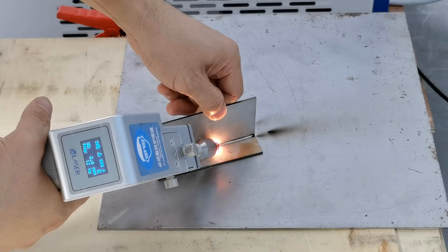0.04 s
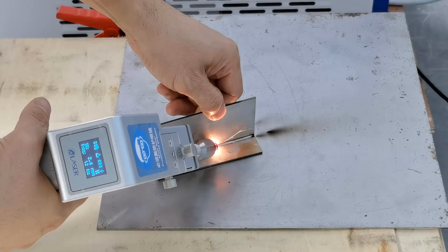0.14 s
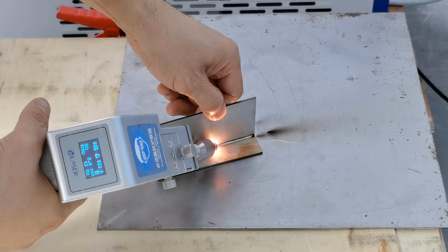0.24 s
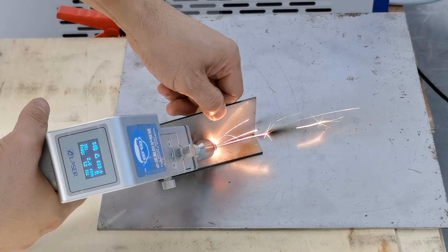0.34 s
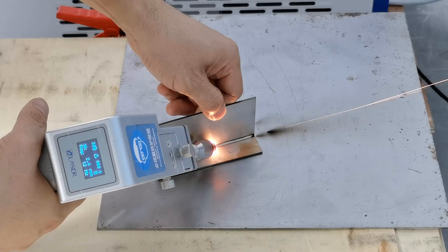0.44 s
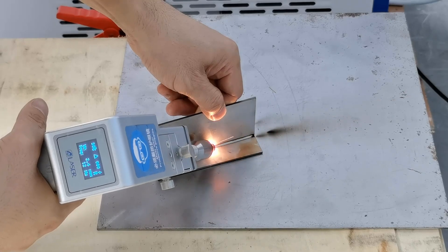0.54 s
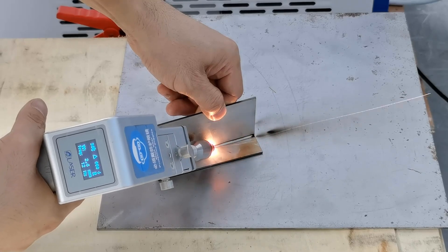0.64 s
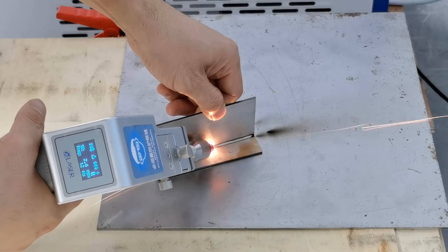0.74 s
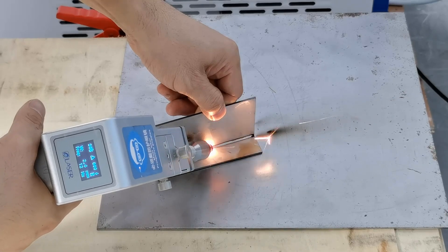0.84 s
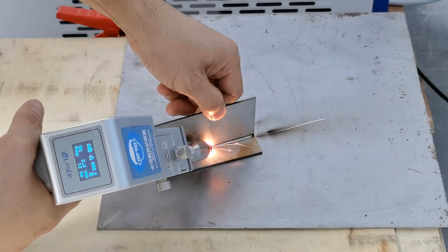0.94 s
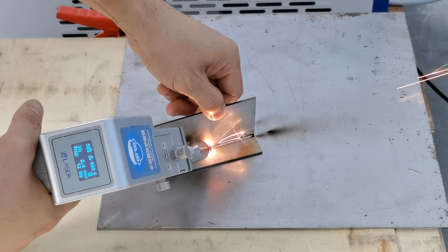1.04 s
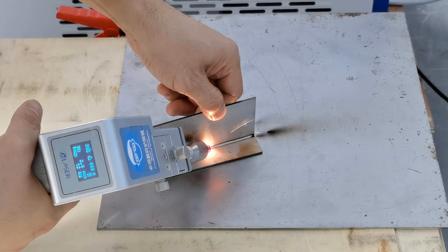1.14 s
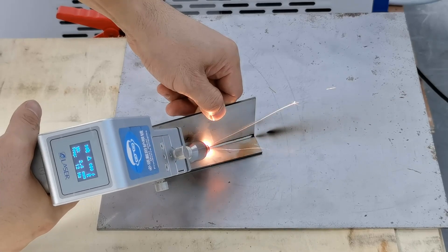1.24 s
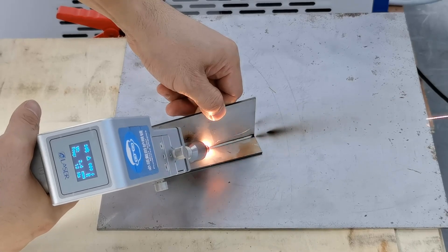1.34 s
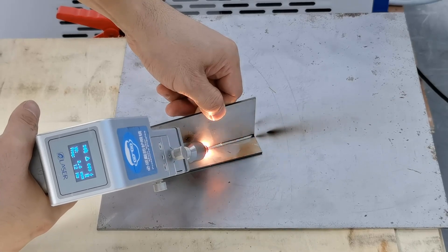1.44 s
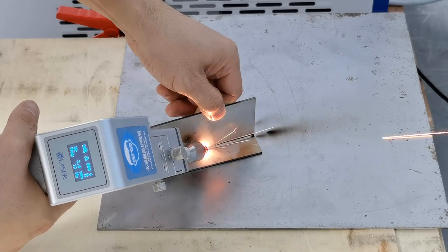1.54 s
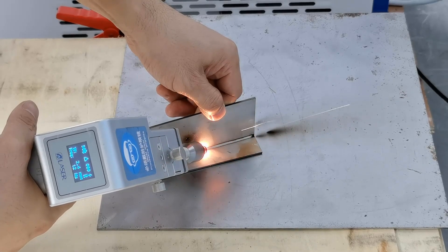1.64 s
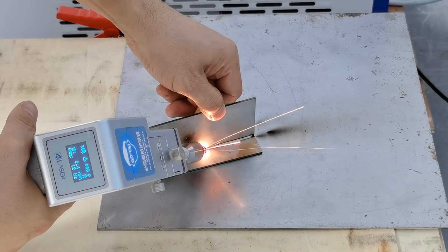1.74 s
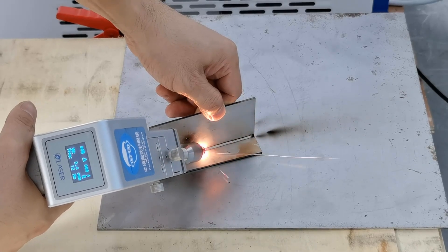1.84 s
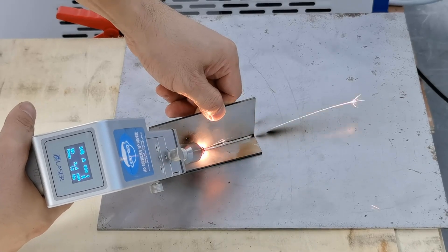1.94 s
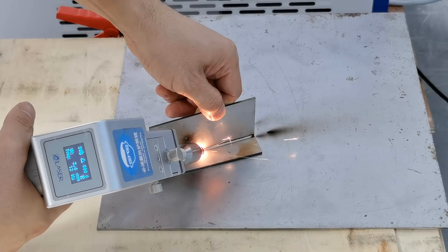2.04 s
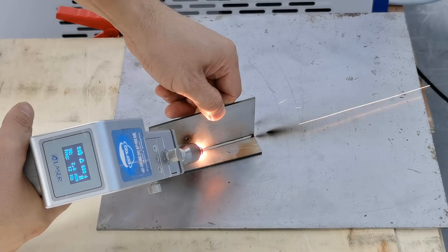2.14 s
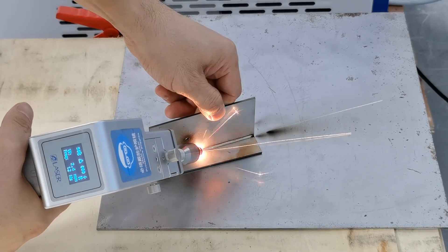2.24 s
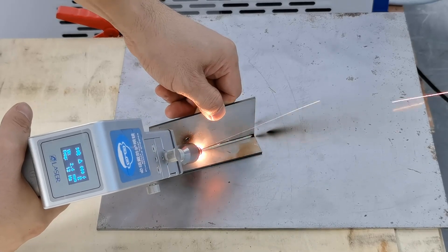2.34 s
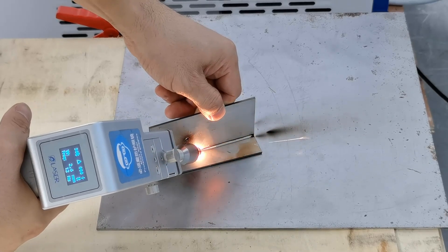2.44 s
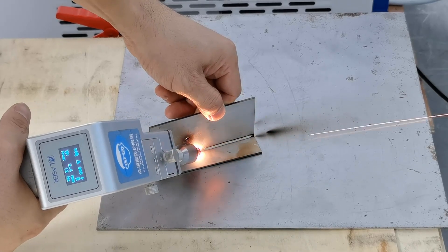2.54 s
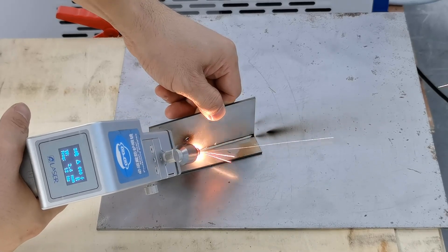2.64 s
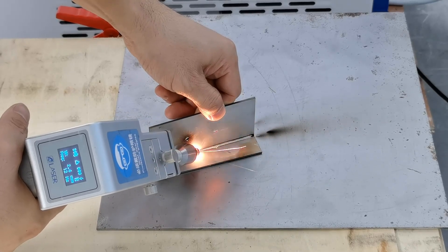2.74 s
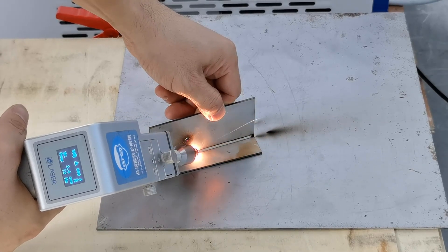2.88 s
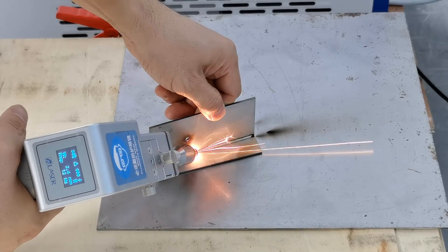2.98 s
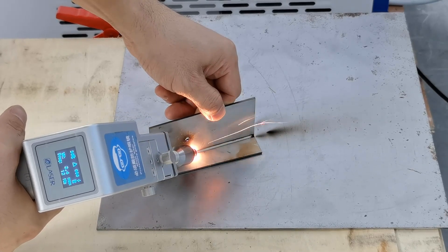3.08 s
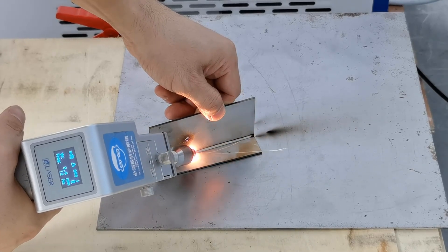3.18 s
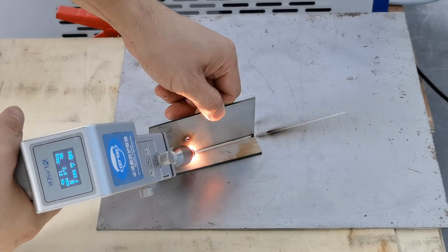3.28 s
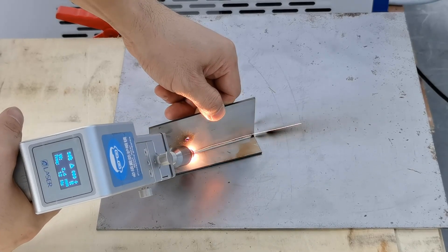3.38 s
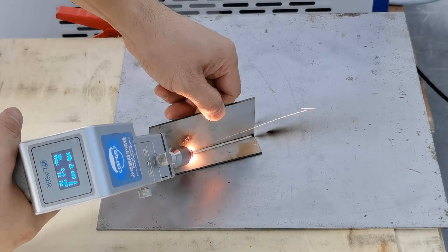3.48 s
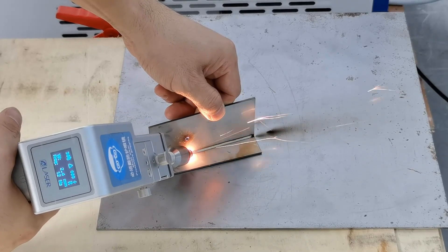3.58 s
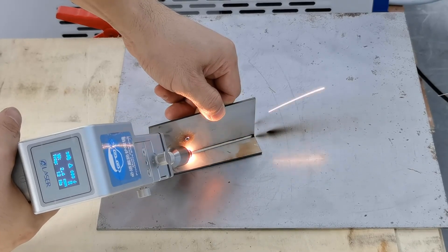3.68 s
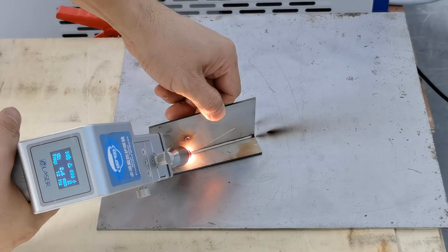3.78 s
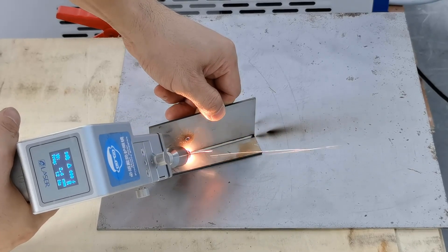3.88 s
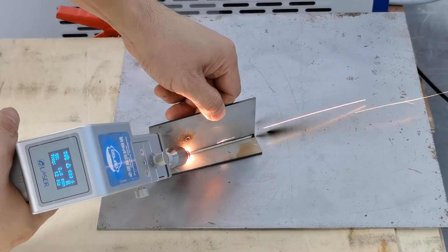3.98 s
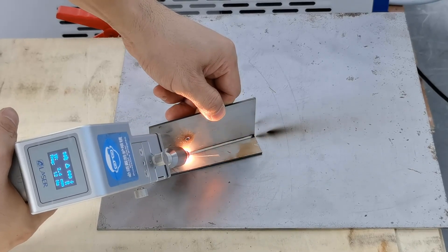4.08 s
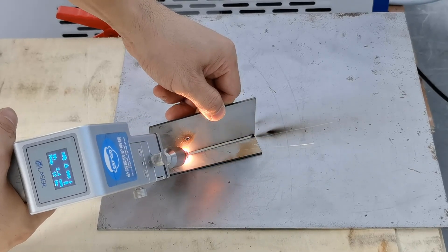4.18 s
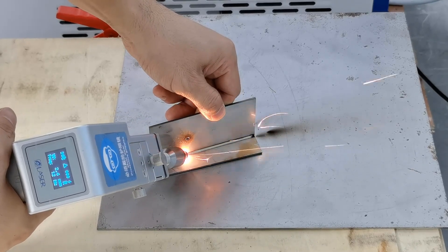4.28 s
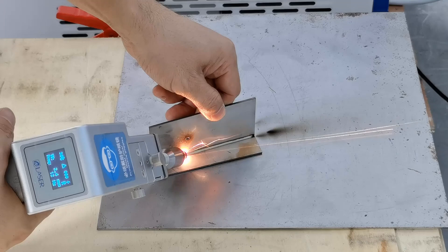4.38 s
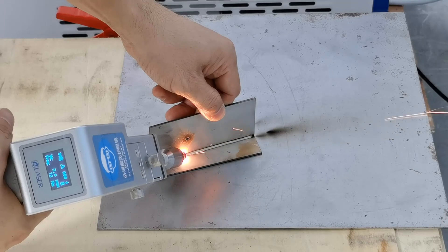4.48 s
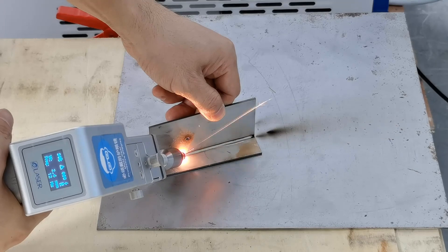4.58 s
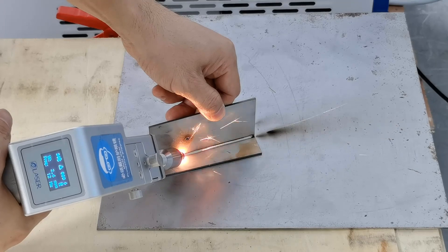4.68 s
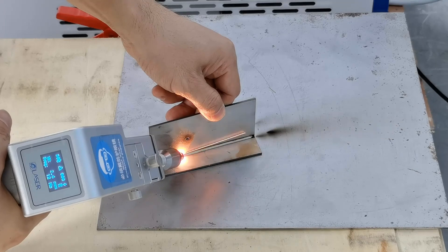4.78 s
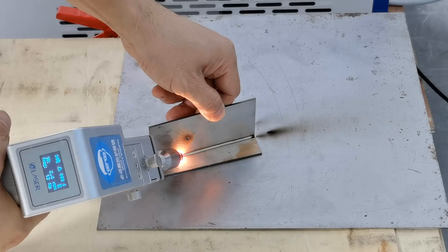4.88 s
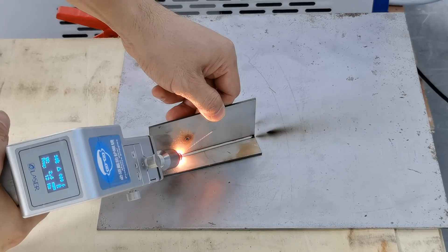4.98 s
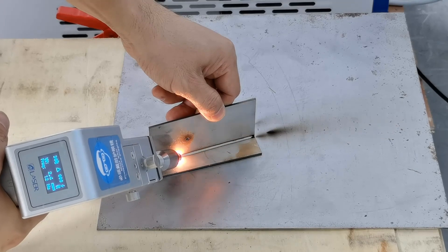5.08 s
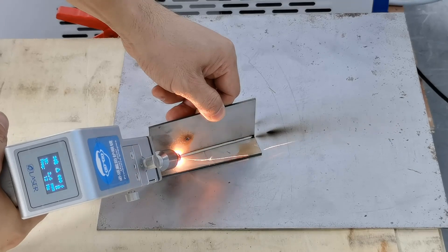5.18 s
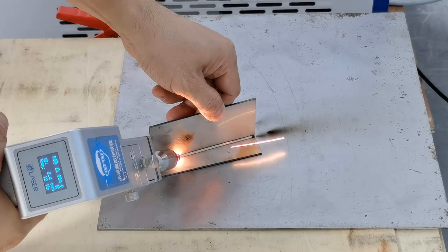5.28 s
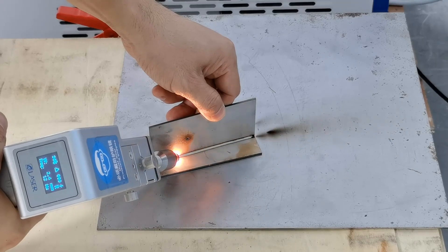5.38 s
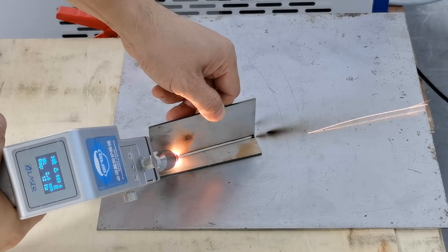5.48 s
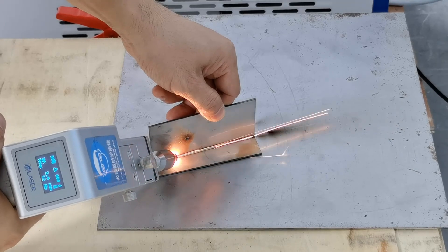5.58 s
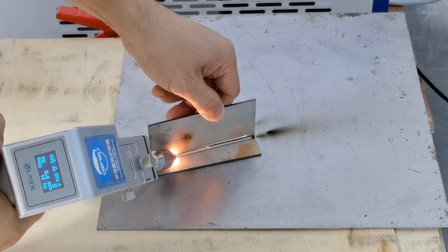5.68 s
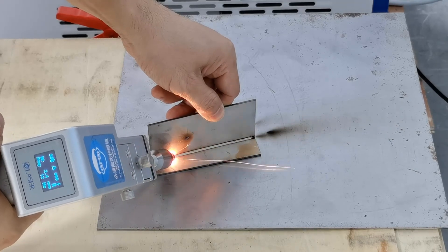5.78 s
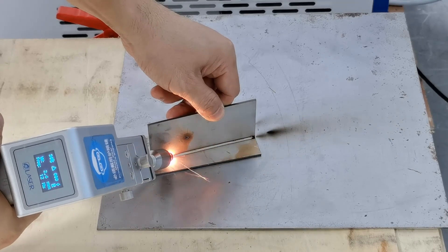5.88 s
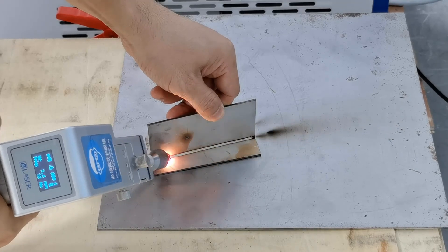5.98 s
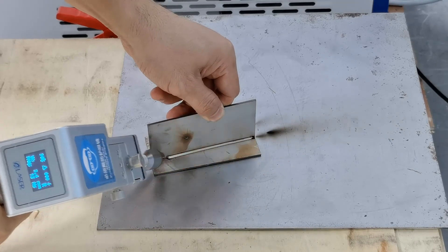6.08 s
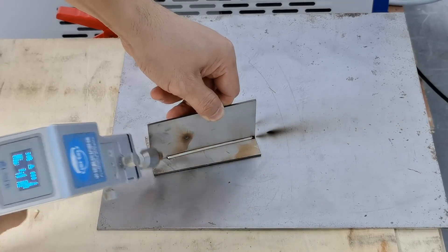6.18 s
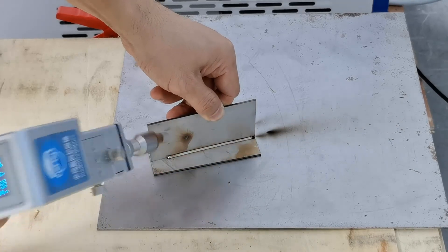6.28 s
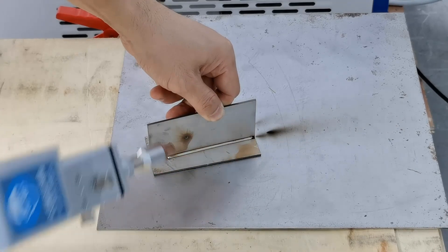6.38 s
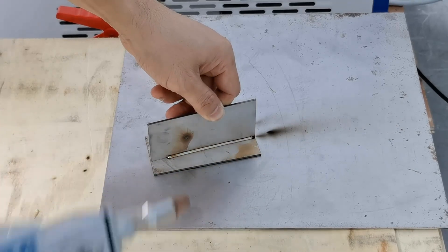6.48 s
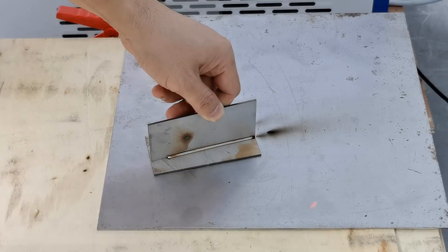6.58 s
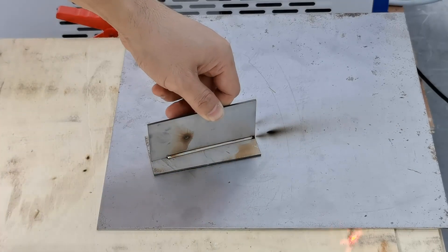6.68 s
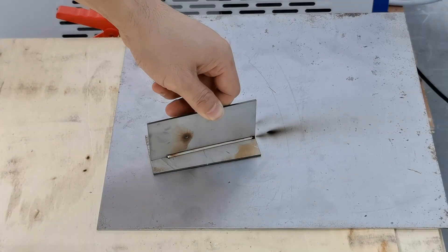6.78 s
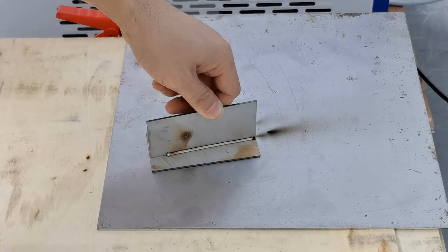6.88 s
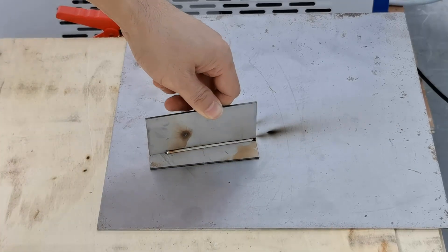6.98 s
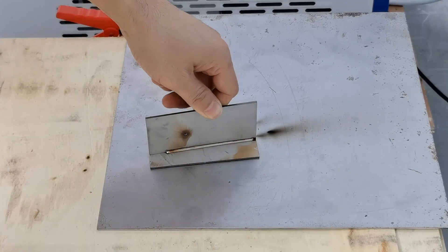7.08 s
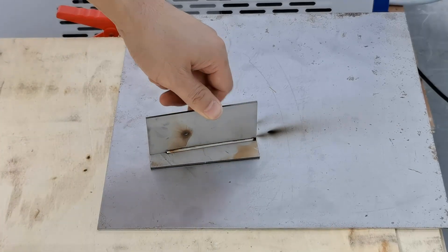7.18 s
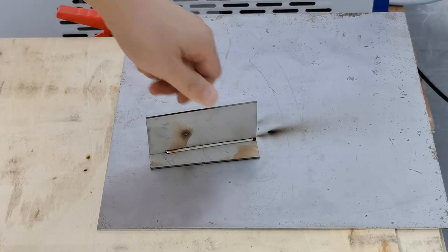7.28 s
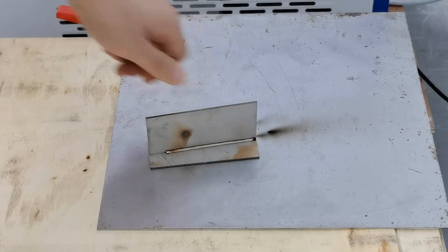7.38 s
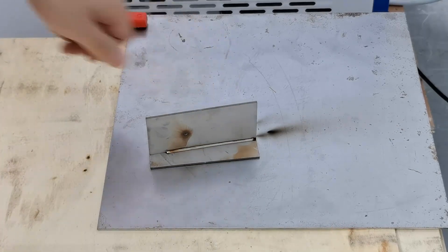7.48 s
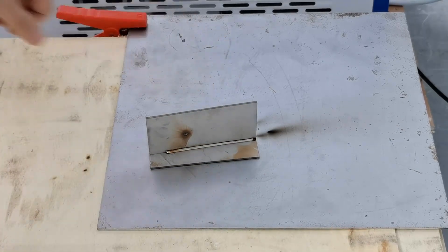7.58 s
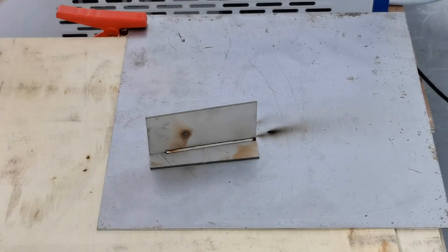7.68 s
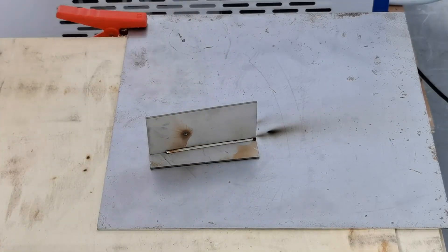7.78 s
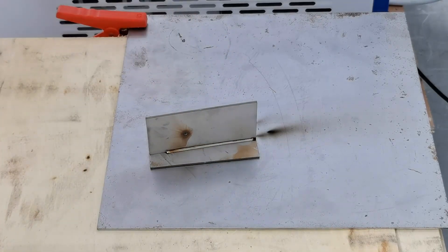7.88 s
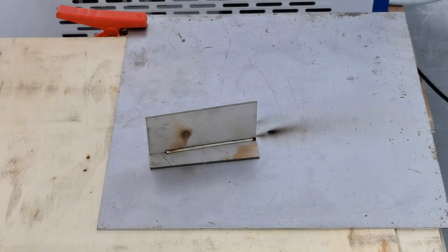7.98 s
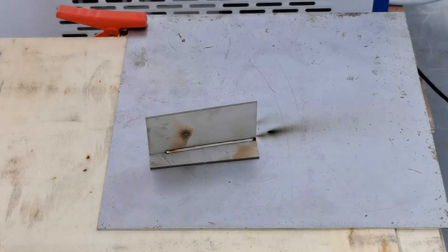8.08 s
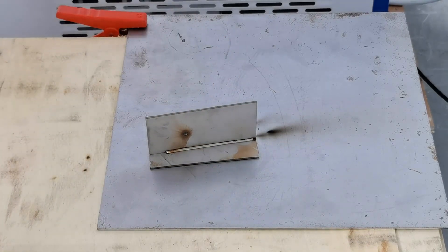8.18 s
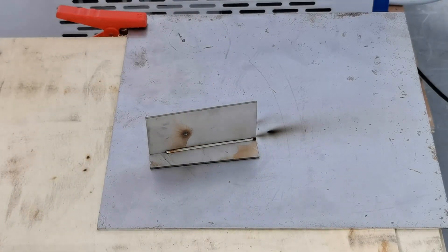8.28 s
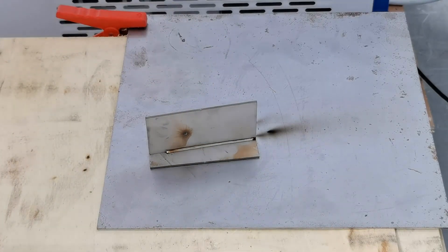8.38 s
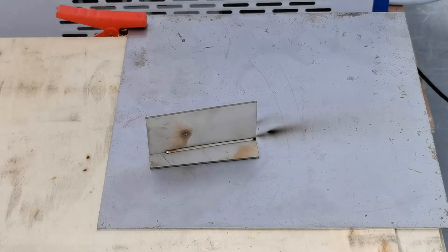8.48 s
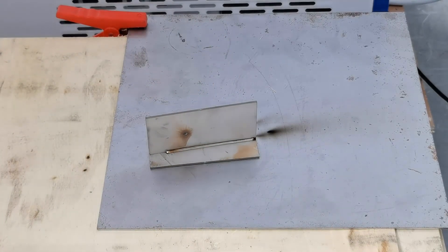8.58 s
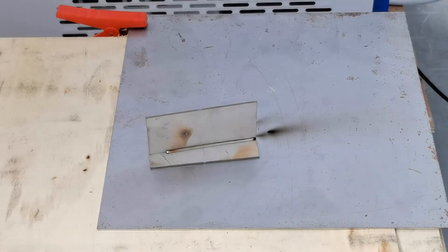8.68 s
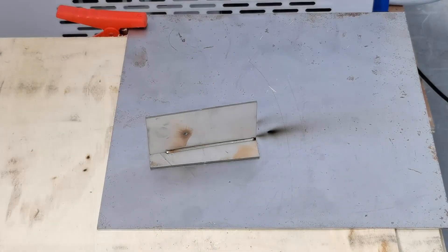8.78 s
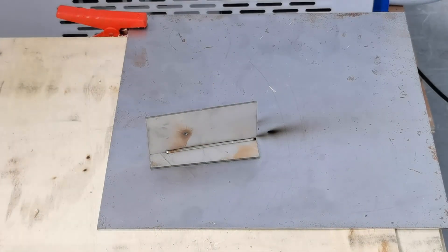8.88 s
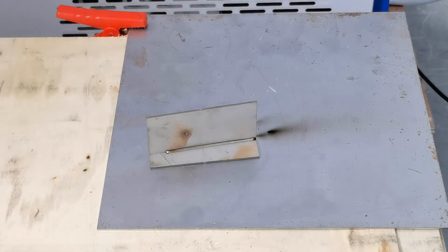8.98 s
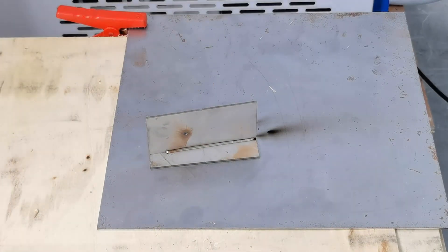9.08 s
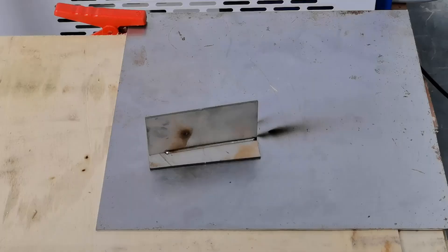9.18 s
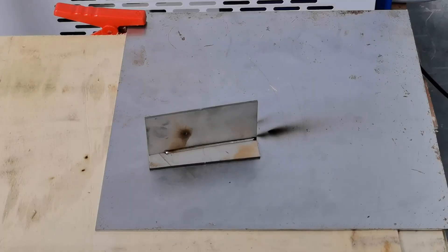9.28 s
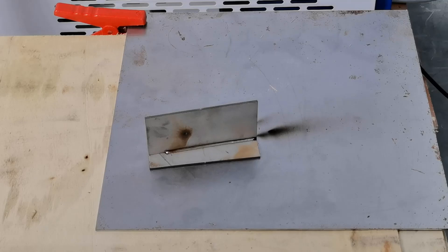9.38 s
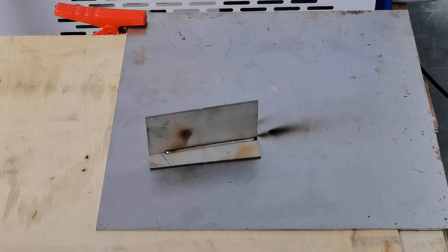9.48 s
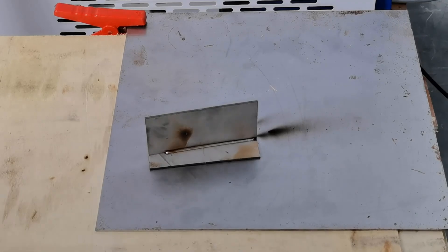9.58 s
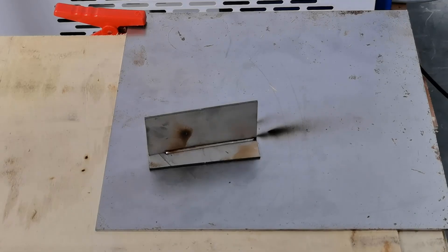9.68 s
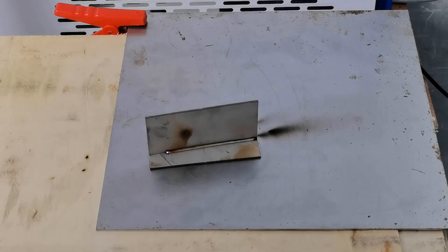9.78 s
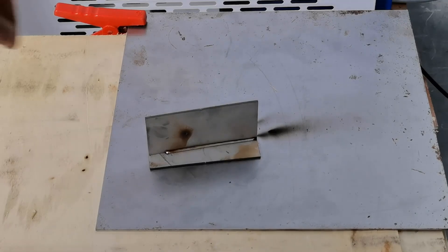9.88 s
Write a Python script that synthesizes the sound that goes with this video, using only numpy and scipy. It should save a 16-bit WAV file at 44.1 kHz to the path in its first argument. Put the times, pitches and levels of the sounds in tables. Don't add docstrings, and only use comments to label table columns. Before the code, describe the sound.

Close up at a workshop bench, a handheld laser welder gives a loud, bright gas hiss with a rapid low throb for about six seconds. It breaks into a brief smooth jet, a valve rattles shut, and a thin leak fades. Small cable taps, heavy footsteps and cloth brushes follow over quiet fans, then a far machine starts up with a thin belt squeal. Phone microphone, stereo.

```python
import sys
import numpy as np
from scipy import signal
from scipy.fft import rfft, irfft
from scipy.io import wavfile
from scipy.ndimage import uniform_filter1d

SR = 44100
rng = np.random.default_rng(int(sys.argv[2]) if len(sys.argv) > 2 else 0)


def transcribe(u):
    v = np.clip(np.atleast_2d(u).T, -1, 1)
    q = np.round(v * 32767).astype(np.int16)
    wavfile.write(sys.argv[1], SR, q)


def gain_from_decibels(decibels):
    exponent = np.asarray(decibels, float) / 20
    return 10 ** exponent


N = 438354
TIME = np.arange(N) / SR
BINS = np.fft.rfftfreq(N, 1 / SR) + 1
BEAM_OFF_S = 6.045


def unit(x):
    return x / np.sqrt(np.mean(x ** 2))


def since(s):
    return np.maximum(TIME - s, 0)


def over_hz(table):
    hz, value = np.transpose(table)
    return np.interp(np.log(BINS), np.log(hz), value)


def resonances(table):
    return sum(db / (1 + (2 * (BINS - hz) / width) ** 2) for hz, width, db in table)


def shape(x, gain):
    return irfft(rfft(x, N) * gain, N)


def walk(rate):
    k = int(SR / rate)
    held = np.repeat(rng.standard_normal(N // k + 1), k)
    return unit(uniform_filter1d(uniform_filter1d(held, k), k)[:N])


def sides(db):
    db = np.atleast_1d(db)
    return gain_from_decibels(np.array([db, -db]) / 2)


def add(out, x, s):
    i = int(s * SR)
    out[:, i:i + x.shape[1]] += x[:, :N - i]


def pair(db, alike, moving=False):
    # time in seconds, samples by which the right port lags
    right_lag = [(0, 1.2), (6.1, 2.9)]
    shared, own = rng.standard_normal(N), rng.standard_normal((2, N))
    late = shared
    if moving:
        hz, s, frames = signal.stft(shared, SR, nperseg=1024)
        lag = np.interp(s, *np.transpose(right_lag))
        late = signal.istft(frames * np.exp(-2j * np.pi * np.outer(hz, lag) / SR), SR)[1][:N]
    alike = np.clip(alike, 0, 1)
    common = shape(np.array([shared, late]), gain_from_decibels(db) * alike ** .5)
    return common + shape(own, gain_from_decibels(db) * (1 - alike) ** .5)


def breathe(x, edges_hz, slow_db, quick_db):
    band = np.digitize(BINS, edges_hz)
    out = 0
    for k in range(len(edges_hz) + 1):
        out = out + shape(x, band == k) * gain_from_decibels(slow_db * walk(2.3) + quick_db * walk(14))
    return out


def returns():
    spread_ms, echo_db, echo_hz = 26, -17.5, 5000
    lag_s = .002 + rng.random((2, 24, 1)) * spread_ms / 1000
    size = gain_from_decibels(echo_db - 6 * lag_s * 1000 / spread_ms) * np.sign(rng.standard_normal((2, 24, 1)))
    ripple = np.sum(size * np.exp(-2j * np.pi * BINS * lag_s), axis=1)
    return 1 + BINS / (BINS + echo_hz) * 1.5 * ripple


def waver(x, dips):
    drift, rate_hz = .01, 24
    hz, s, frames = signal.stft(x, SR, nperseg=1024)
    at, dip_db = np.minimum(s * SR, N - 1).astype(int), 0
    for centre, width, depth_db in dips:
        depth = 1.3 * depth_db * np.maximum(.45 + walk(rate_hz)[at], 0) ** 1.5
        away = (hz[:, None] - centre * (1 + drift * walk(1.5)[at])) / width
        dip_db = dip_db - depth * np.exp(-(2 * away) ** 4)
    return signal.istft(frames * gain_from_decibels(dip_db), SR)[1][:, :N]


def echo(length=.9):
    # band in Hz, level in dB, t60 in seconds
    walls = [(60, -6, 1), (127, 1.5, 0.56), (257, 4, 0.46), (500, -1.5, 0.28), (980, 0, 0.38),
             (2000, -15, 0.49), (4500, -12, 0.47), (9000, -20, .3)]
    t, tail = np.arange(int(length * SR)) / SR, 0
    for hz, db, t60 in walls:
        octave = signal.butter(2, [hz / 1.27, hz * 1.53], "bandpass", fs=SR, output="sos")
        mid, side = signal.sosfilt(octave, rng.standard_normal((2, len(t))))
        both = mid + min(0.13 + hz / 1100, 1) * side * np.array([[1], [-1]])
        tail = tail + gain_from_decibels(db - 60 * t / t60) * both / hz ** .5
    return tail * np.clip(t / 0.0021, 0, 1)


def workshop():
    # frequency in Hz, level in dB per Hz
    rumble_hz = [(12, -42), (20, -8.5), (81, -1.5), (285, -12), (350, -19), (381, -20), (510, -18.5),
                 (648, -26), (1100, -23), (1200, -36.5), (1560, -60), (2640, -120)]
    rustle_hz = [(350, -39), (600, -7), (651, -6.5), (902, -13), (1110, -8.5), (1250, -9.5), (1490, -11.5),
                 (2010, -15.5), (4430, -19.5), (7040, -28.5), (13300, -26), (14500, -26.5), (15000, -55.5)]
    # frequency in Hz, level in dB rms
    fan_tones = [(48.4, -62), (96.9, -75.5), (129.2, -68.5), (285.3, -72.5), (382.2, -78), (473.7, -70.5),
                 (667.5, -75), (1141, -79.5), (2283, -82), (2659, -82.5)]
    machine_s, kick_share, run_up_s = 9.255, 0.75, .2
    busy = np.exp(-.5 * ((TIME - 7.95) / 0.29) ** 2)
    machine = (TIME > machine_s) * (1 - (1 - kick_share) * np.exp(-since(machine_s) / run_up_s))
    rumble_alike = over_hz([(100, 0.82), (400, 0.54), (900, .1)])
    rumble = gain_from_decibels(-55.5 + 3 * busy + 9 * machine) * unit(pair(over_hz(rumble_hz), rumble_alike))
    rustle = gain_from_decibels(-64 + 3 * busy + 7.5 * machine) * unit(pair(over_hz(rustle_hz), 0.038))
    fans = 0
    for hz, db in fan_tones:
        turn = 2 * np.pi * hz * TIME + 0.76 * walk(3) + hz * np.array([[0], [.0008]])
        fans = fans + gain_from_decibels(db + 4 + 2.5 * walk(4)) * np.sin(turn)
    return breathe(rumble + rustle, [90, 250, 700, 2000, 5500], 0.55, 1.7) + fans


def squeal():
    # multiple of the slip rate, level in dB
    slip_tones = [(3, -22), (4, -12), (5, -20), (6, -15.5), (7, -4), (8, 4), (9, -7)]
    from_hz, to_hz, rise_s = 1420, 1690, .042
    caught = since(9.762)
    hz = to_hz - (to_hz - from_hz) * np.exp(-caught / rise_s)
    gain = np.clip(caught / 0.007, 0, 1) * gain_from_decibels(-57.5 - 10 * np.exp(-caught / .06))
    turn = 2 * np.pi * np.cumsum(hz * (1 + .026 * walk(600))) / SR
    tones = 0
    for k, db in slip_tones:
        flicker_db = 3.5 * np.array([walk(90), walk(90)])
        tones = tones + gain_from_decibels(db + flicker_db) * np.sin(k * turn + np.array([[0], [k]]))
    return gain * tones


def thuds(blows, low_hz):
    # mode in Hz, level in dB, t60 in seconds
    floor_modes = [(64.8, -5, 0.59), (113, -16, 0.43), (166, -1.5, 0.64), (199.4, 2.5, 0.6),
                   (239.4, 1.5, 0.35), (348, -8.5, .3), (433, 0, 0.36), (490, 8, 0.33), (670, -6, 0.35),
                   (770, -12, .25), (1003, 13.5, 0.24), (1130, -3, .23)]
    out, t = np.zeros((2, N)), np.arange(int(.9 * SR)) / SR
    for s, blow_db, contact_ms, slap_db, delay_ms in blows:
        ring = 0
        for hz, db, t60 in floor_modes:
            a, b = rng.standard_normal(2)
            ring = ring + gain_from_decibels(db + 2.8 * a - 60 * t / t60) * np.sin(2 * np.pi * hz * (1 + 0.015 * b) * t)
        push = t[:900] * np.exp(-t[:900] * 1000 / contact_ms)
        first = -1.5 * gain_from_decibels(-60 * t / 0.024) * np.sin(2 * np.pi * 170 * t)
        struck = first - 0.29 * ring + gain_from_decibels(30.0) * echo()
        add(out, gain_from_decibels(blow_db) * signal.fftconvolve(struck, push[None] / push.sum(), axes=1), s)
        bright_hz = 620 + 27 * (slap_db + 47)
        slap = gain_from_decibels(-60 * t / 0.089) * rng.standard_normal((2, len(t)))
        slap = slap + gain_from_decibels(38) * signal.lfilter([1, -.9], 1, echo())
        slap = signal.lfilter(*signal.butter(1, [bright_hz / 2, bright_hz * 0.64], "bandpass", fs=SR), slap)
        slap = signal.lfilter(*signal.butter(1, 5500, fs=SR), slap)
        add(out, gain_from_decibels(slap_db + 14.5) * slap, s + delay_ms / 1000)
    return signal.lfilter(*signal.butter(2, low_hz, "highpass", fs=SR), out)


def footsteps():
    # start in seconds, blow in dB, contact in ms, slap in dB, slap delay in ms
    steps = [
        (7.446, -12.5, 1.22, -30, 1.21),
        (7.882, -25, 2.9, -54, 5.1),
        (8.093, -16.5, 0.52, -20.5, 7.3),
        (8.2, -16.5, 2.3, -38, 2.8),
        (8.267, -30, 1.3, -53, 1.7),
        (9.258, -38.5, 0.87, -50, 2.5),
    ]
    return thuds(steps, low_hz=45.5)


def brushes():
    # start in seconds, length in seconds, level in dB
    drags = [
        (7.458, 0.043, -53),
        (7.797, 0.053, -61),
        (7.889, 0.1, -57.5),
        (8.098, 0.066, -50.5),
        (8.552, 0.034, -69),
    ]
    swell = 0
    for s, length, db in drags:
        swell = swell + gain_from_decibels(db) * np.exp(-.5 * ((TIME - s - length / 2) / (length / 2.7)) ** 2)
    tone = resonances([(1275, 640, 11), (2960, 520, 6.6), (4730, 1300, 14)])
    tone = tone + over_hz([(500, -23), (1000, -4), (6000, -16), (12000, -10), (14400, -13), (15000, -45)])
    return swell * gain_from_decibels(1.5 * walk(120)) * unit(pair(tone, .2))


def cable_taps():
    # start in seconds, level in dB, mode in Hz, second mode in Hz, t60 in seconds
    tap_list = [(6.829, -51, 4500, 5200, .012), (6.844, -33.5, 970, 1580, 0.039),
                (6.848, -41, 900, 1650, 0.03), (6.865, -44, 1050, 2700, 0.04), (6.888, -48, 1050, 804, .05),
                (6.925, -54, 1080, 900, .06), (6.995, -52, 1100, 800, .07), (7.006, -59, 7800, 1100, 0.022),
                (7.102, -59, 4100, 1030, .03), (7.226, -59, 4200, 1100, .03), (7.255, -56, 4400, 1080, .02),
                (7.593, -42, 1850, 4750, 0.02), (7.5935, -45, 11300, 8200, 0.0095),
                (8.044, -50, 4500, 3300, .02), (9.46, -57, 4900, 4500, 0.022)]
    out, t = np.zeros((2, N)), np.arange(int(.12 * SR)) / SR
    for s, db, hz, second_hz, t60 in tap_list:
        modes = np.sin(2 * np.pi * hz * t) + 0.52 * np.sin(2 * np.pi * second_hz * t)
        ring = gain_from_decibels(-190 * t / t60) * modes
        blow = gain_from_decibels(-60 * t / t60) * rng.standard_normal((2, len(t)))
        blow[:, 0] = 3
        knock = 0.18 * signal.fftconvolve(ring[None], blow, axes=1)
        add(out, gain_from_decibels(db) * knock * sides(1.5), s)
        add(out, gain_from_decibels(db - 8) * signal.fftconvolve(knock, echo(), axes=1), s)
    return out


def valve_knocks():
    # start in seconds, blow in dB, contact in ms, slap in dB, slap delay in ms
    knocks = [
        (6.188, -36, 1.1, -41, 2.4),
        (6.2, -31, 1.1, -38.5, 3.4),
        (6.212, -33, 0.55, -35, 1.9),
        (6.228, -35, 0.73, -41, 2.5),
        (6.257, -35, 0.67, -44, 3),
    ]
    return thuds(knocks, low_hz=106)


def after_flow():
    # frequency in Hz, level in dB per Hz
    jet_hz = [(180, -32.5), (300, -10), (450, -21), (487, -12), (708, -18), (1100, -7), (1830, -11),
              (3320, -5), (4130, -9), (4680, 2), (5470, -0.5), (6390, -10), (8730, -2.5), (12500, -19),
              (16200, -38), (22000, -120)]
    leak_hz = [(5000, -55), (8500, -25.5), (8940, -21.5), (9680, -8.5), (10300, -15), (10500, -19.5),
               (10600, -12), (12300, -2.5), (13500, -8), (14900, 0.5), (16000, -10)]
    start = np.clip((TIME - 6.0) / 0.036, 0, 1)
    shut, seated = since(6.21), since(7.05)
    whistle = gain_from_decibels(-29 - 25.5 * since(BEAM_OFF_S) - 193 * shut)
    seep = gain_from_decibels(-55 - 14.5 * shut - 202 * seated)
    blowing = gain_from_decibels(-32 - 141 * shut)
    trickle = gain_from_decibels(-68 - 18 * shut)
    jet = (blowing + trickle) * unit(pair(over_hz(jet_hz), 0.2))
    leak = (whistle + seep) * unit(pair(over_hz(leak_hz), .2))
    return start * breathe(shape(jet + leak, returns()), [4000, 9000, 12000], 0.46, 1.0) * sides(-1.5)


def weld():
    # frequency in Hz, level in dB per Hz
    gas_hz = [(25, -12.5), (100, -26), (350, -26), (1000, -28), (2500, -16.5), (4500, -8), (7000, -21.5),
              (11000, -14.5), (16000, -11)]
    plume_hz = [(300, -36.5), (2500, -30), (5000, -13.5), (7000, -8.5), (9500, -10), (13000, -10),
                (16000, -8)]
    # centre in Hz, width in Hz, lift or dip in dB
    left_port = [(60.3, 310, -6.5), (910, 95, 0.5), (3240, 100, 2), (3650, 90, -4), (1100, 880, 8.5),
                 (2424, 260, 4), (3994, 140, -6.5), (5140, 1600, 6), (5830, 180, -5.5), (10655, 200, 10.5),
                 (11580, 850, 10), (12260, 300, -2), (13900, 300, 2.5), (15200, 400, 5.5)]
    right_port = [(910, 110, -2), (3900, 90, -2), (1100, 560, 7), (2400, 190, -5), (3930, 110, -4),
                  (4400, 280, -8), (5750, 400, 0.5), (7824, 110, 9), (8390, 625, 12.5), (8630, 300, -3.5),
                  (10660, 500, 2.5), (11800, 300, -4), (12220, 250, -9), (13500, 1500, 7), (15000, 400, -5)]
    # frequency in Hz, share both ports hear
    shared_part = [(60, .3), (300, 0.45), (700, 1), (1300, 0.36), (2000, 0.75), (2800, 0.55), (6000, 0.71),
                   (9000, 0.51), (15000, 0.33)]
    # multiple of the swing rate, level in dB rms, phase in radians
    hum_tones = [(1, -51.5, 2.3), (2, -64, 2.1), (3, -65, .7), (4, -68, 1.9), (5, -74.5, .3),
                 (7, -71.5, 1.1)]
    # multiple of the swing rate, level in dB rms
    whine_tones = [(9, -64.5), (10, -63.5)]
    # centre in Hz, width in Hz, typical depth in dB
    weld_dips = [(1720, 70, 6), (1930, 80, 7), (2200, 80, 6), (2550, 90, 7), (3080, 90, 7), (3280, 120, 10),
                 (3580, 110, 10), (3780, 90, 7), (3950, 140, 11), (4250, 100, 7), (5700, 120, 7),
                 (5950, 140, 8), (6350, 110, 5), (6650, 110, 5), (7450, 110, 4), (9000, 110, 3),
                 (9600, 140, 4), (10100, 120, 4), (12180, 140, 6)]
    swing = 2 * np.pi * 52.5 * TIME
    left_s = BEAM_OFF_S - TIME
    on = np.clip(left_s / 0.03, 0, 1)
    welded = np.minimum(TIME, BEAM_OFF_S)
    plume_db = -19.5 + 0.41 * welded - 4.5 * np.clip(1 - left_s / 0.28, 0, 1)
    gas_db = -20 - .5 * welded
    ports, alike = np.array([resonances(left_port), resonances(right_port)]), over_hz(shared_part)
    throb = gain_from_decibels((5.0 + 0.7 * walk(3.7)) * np.cos(swing + 0.25) + 1.0 * walk(300))
    plume = throb * gain_from_decibels(plume_db) * unit(pair(over_hz(plume_hz) + ports, alike, moving=True))
    gas = gain_from_decibels(gas_db) * unit(pair(over_hz(gas_hz) + ports, alike, moving=True))
    hiss = waver(shape(plume + gas, returns()), weld_dips)
    hiss = breathe(hiss, [500, 1500, 3000, 6000, 9200, 12200], 0.55, 0.58) * sides(-3.1 - .2 * welded)
    hum = sum(gain_from_decibels(db + 4.0) * np.cos(k * swing + turn) for k, db, turn in hum_tones)
    hum = hum * gain_from_decibels(np.interp(TIME, [0, 3], [-3, 0.5]) + 1.5 * walk(2.5)) * sides(-8)
    whine = sum(gain_from_decibels(db + 2.2 * walk(3)) * np.cos(k * swing) for k, db in whine_tones) * sides(4.5)
    return on * (hiss + whine + hum)


def scene():
    # centre in Hz, width in Hz, typical
    # depth in dB
    room_dips = [(3900, 160, 4), (5700, 200, 6), (6300, 200, 8), (6900, 220, 8), (7900, 200, 6),
                 (8800, 200, 7), (9300, 160, 6), (10500, 260, 8), (11200, 160, 5), (13800, 220, 6),
                 (14400, 260, 8)]
    room = waver(workshop() + brushes() + after_flow(), room_dips)
    return room + squeal() + footsteps() + cable_taps() + valve_knocks() + weld()


def top_cut(x):
    return signal.sosfilt(signal.butter(12, 16360, fs=SR, output="sos"), x)


def record(dry):
    low = signal.butter(2, 18, "highpass", fs=SR, output="sos")
    top = signal.ellip(14, .3, 75, 15620, fs=SR, output="sos")
    rounded = np.tanh(0.9 * signal.sosfilt(low, dry)) / 0.91
    return top_cut(signal.sosfilt(top, rounded))


dry = scene()
out = record(dry)
transcribe(out)
```